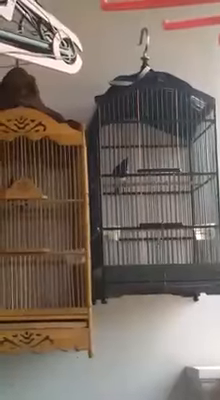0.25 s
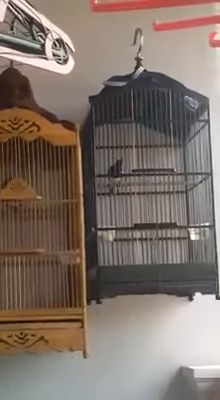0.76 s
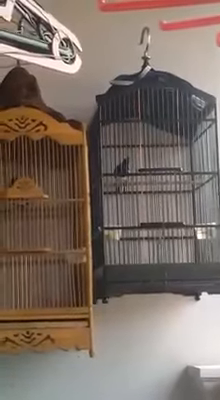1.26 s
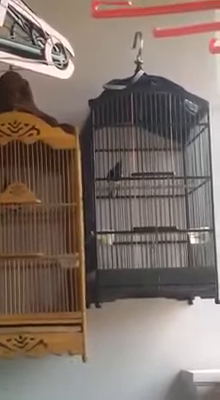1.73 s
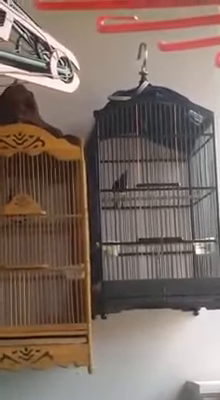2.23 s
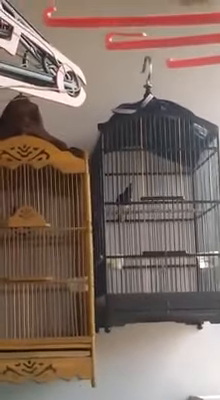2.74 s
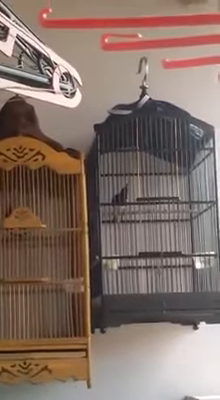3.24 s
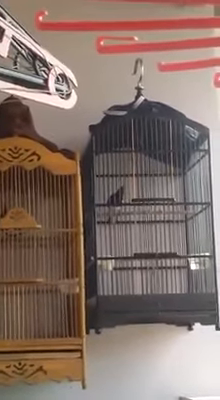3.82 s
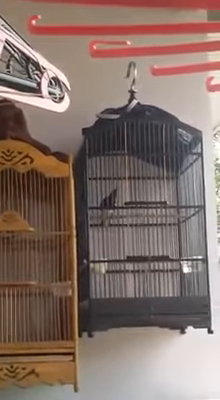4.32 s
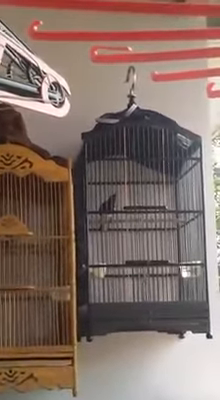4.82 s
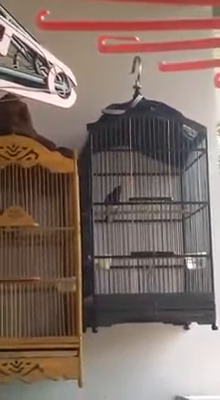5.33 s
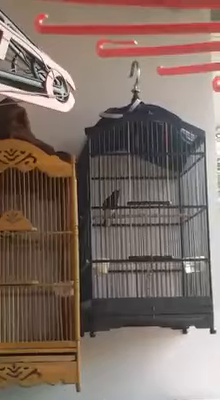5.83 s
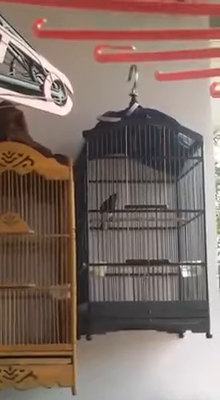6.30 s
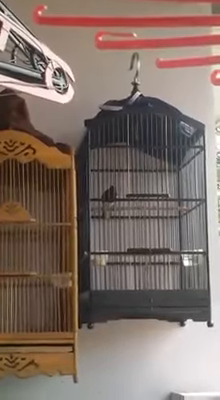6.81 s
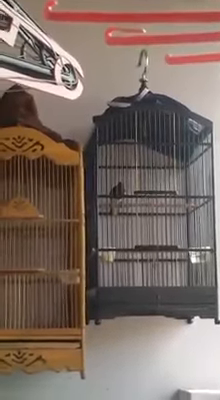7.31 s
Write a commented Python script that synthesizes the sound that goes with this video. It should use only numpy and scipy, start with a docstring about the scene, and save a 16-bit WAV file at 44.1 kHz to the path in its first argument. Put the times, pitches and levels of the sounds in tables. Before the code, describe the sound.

Close bird song with short, hard porch echoes: pure, almost flute-like whistles sliding upward, broken by buzzy, breathy rasps in the middle. After a sparser stretch, the song bursts into fast, loud warbling to the end, with a last rising whistle underneath. Thin high peeps from farther off, small scratchy perch rustles, and a quiet uneven low drone of traffic fill the gaps.

```python
"""Songbirds on a porch

Near birds sing loud warbles, long rising whistles and hoarse rasps that overlap on a hard-walled porch.
Clear notes are near sines with thin upper tones; the rasps are chopped overtones and breath noise.
A farther bird pipes faintly in the same near sines, and feathers rustle as dying puffs of noise.
Low drones, shaped traffic noise and soft hiss lie underneath; sparse random echoes form the walls."""
import sys
import numpy as np
from scipy import signal
from scipy.fft import rfft, irfft
from scipy.io import wavfile
from scipy.ndimage import uniform_filter1d, minimum_filter1d

SR = 44100
rng = np.random.default_rng(int(sys.argv[2]) if len(sys.argv) > 2 else 0)


def put_to_file(sound):
    """Save the sound as 16-bit audio at rate SR, in the file named by the first command-line argument."""
    columns = np.atleast_2d(sound).T  # one column per channel
    safe = np.clip(columns, -1, 1)
    whole_steps = np.round(safe * 32767)
    wavfile.write(sys.argv[1], SR, whole_steps.astype(np.int16))


N = 333396


def near_birds():
    """Near birds: loud warbles, rising whistles and hoarse rasps that overlap."""
    return warble() + rising_whistles() + rasps()


# Warbled notes, each a piece of a pitch wave on a sloping line:
# (start [s], length [s], pitch at mid-note [Hz], slope [Hz/s], wave depth [Hz],
#  wave crest after the start [s], held level [dB], swell [s], fade [s])
WARBLE_NOTES = [(0.272, 0.14, 2463, -2370.0, 242, 0.075, -9, 0.021, 0.03),
                (5.976, 0.19, 2934, -270.0, 79, 0.17, -2.5, 0.085, 0.073),
                (6.258, 0.17, 2438, -3110.0, 253, 0.166, -4.5, 0.028, 0.014),
                (6.505, 0.077, 2333, 4559, 380, 0.0096, -5.5, 0.014, 0.03),
                (6.707, 0.12, 2123, -1230.0, 4.9, 0.024, -5.5, 0.021, 0.043),
                (6.907, 0.11, 2078, 3330.0, 110, -0.019, -5.5, 0.077, 0.011),
                (7.091, 0.145, 2311, -2360.0, 130, 0.132, -3.5, 0.015, 0.014),
                (7.297, 0.12, 2562, -1550.0, 103, 0.039, -7, 0.024, 0.025),
                (7.465, 0.099, 2235, 10.0, 113, 0.017, -8, 0.014, 0.0048)]
# Two warbled notes as the microphone opens, same columns
OPENING_NOTES = [(0, 0.1, 2477, 9995, 10, .04, -10.5, 0.17, .005),
                 (0.094, 0.041, 3075, -500, 10, .03, -34, 0.009, 0.0088)]
# Thin tones of the warble, one per step above the pitch: (level against the note [dB])
WARBLE_UPPER_TONES = (-44.5, -48, -62.5)


def warble():
    """Loud near-sine notes whose pitch rides a slow wave; the octave fades on higher notes."""
    wave_s = 0.16  # period of the pitch wave
    octave_loss_db_per_hz = 0.0625
    out = np.zeros(N)
    for start, length, middle_hz, slope, depth_hz, crest_s, level_db, swell_s, fade_s in OPENING_NOTES + WARBLE_NOTES:
        t, edges = span(length, rise_s=0.0038)
        line_hz = middle_hz + slope * (t - length / 2)
        hz = line_hz + depth_hz * np.cos(2 * np.pi * (t - crest_s) / wave_s)
        db = level_db + swell(t, swell_s, -17, fade_s, -12.5)
        octave_db = -39 - octave_loss_db_per_hz * (hz - 2099.5)
        note = near_sine(edges, hz, db, db, WARBLE_UPPER_TONES, flutter_db=0.48, waver_hz=12, fuzz=0.56,
                         octave_db=octave_db, fuzz_cutoff_hz=210)
        add(out, start, note)
    return out


# Long whistles that climb to a knee, then creep on:
# (start [s], length [s], first pitch [Hz], climb [Hz/s], knee pitch [Hz], sway about the climb [Hz],
#  level before growth and echoes [dB], growth [dB/s], thin tones before growth and pitch gain [dB],
#  swell [s], fade [s])
WHISTLE_NOTES = [(0.783, 0.85, 2871, 1993, 3877, 8, -31, 10, -32.5, 0.087, 0.16),
                 (2.778, 0.8, 2204, 936, 2787, 6.5, -21.5, -0.5, -21, 0.018, 0.16),
                 (4.289, 1.013, 3038, 1446, 4330, 46.5, -20, -2, -21, 0.014, 0.078),
                 (6.991, 0.54, 2708, 2095, 3900, -22, -28, -0.2, -40, 0.041, 0.012)]
# Wall echoes lift some whistle pitches and cancel others: (pitch [Hz], gain [dB])
WALL_GAIN = [(2220, -10), (2310, -1.5), (2345, -15.5), (2385, 0), (2670, -6.5), (2740, 2), (2790, -5.5),
             (2840, -1.5), (3060, -7), (3150, -0.5), (3210, -13), (3290, -1.5), (3470, -8), (3600, -2),
             (3720, -9.5), (3790, 2.5), (3840, -4.5), (3890, -3), (4040, -8), (4170, 7.5), (4310, 8)]
# Level of the thin tones, by the pitch under them: (pitch [Hz], gain [dB])
UPPER_TONE_GAIN = [(2250, -21), (2450, -27), (2700, -35), (2800, -27), (3050, -18.5), (3180, -36.5),
                   (3300, -13), (3620, 0), (3760, -7), (3920, -3), (4150, -11), (4320, -41)]
# Thin tones of the whistles, one per step above the pitch: (gain [dB])
WHISTLE_UPPER_TONES = (-7, -32, -39)


def rising_whistles():
    """Long near-sine glides whose level, and that of their thin tones, varies with pitch."""
    creep_hz_per_s = 285
    out = np.zeros(N)
    for (start, length, first_hz, climb, knee_hz, sway_hz, level_db, growth_db, thin_db,
         swell_s, fade_s) in WHISTLE_NOTES:
        t, edges = span(length, rise_s=0.0043)
        knee_s = (knee_hz - first_hz) / climb
        hz = first_hz + climb * np.minimum(t, knee_s) + creep_hz_per_s * np.maximum(t - knee_s, 0)
        hz = hz + sway_hz * np.sin(2 * np.pi * np.minimum(t / knee_s, 1))
        effort_db = growth_db * t + swell(t, swell_s, -17.5, fade_s, -26.5)
        db = level_db + effort_db + np.interp(hz, *np.transpose(WALL_GAIN))
        upper_db = thin_db + effort_db + np.interp(hz, *np.transpose(UPPER_TONE_GAIN))
        note = near_sine(edges, hz, db, upper_db, WHISTLE_UPPER_TONES, flutter_db=3.0, waver_hz=12.5,
                         fuzz=0.43, octave_db=-6)
        add(out, start, note)
    return out


# Hoarse calls that slide to a knee, then creep on:
# (start [s], length [s], first pitch [Hz], knee pitch [Hz], slide [s], creep [Hz/s],
#  voice peak after the start [s], voice level at its peak [dB], voice fall [dB/s],
#  lowest tone before flutter and beak loss [dB], breath level after its swell [dB],
#  breath fall, negative grows [dB/s], breath colour [Hz])
RASP_CALLS = [(2.208, 0.306, 1278, 2033, .125, 1930, 0.12, -11.5, 105, -24, -17.5, 125, 6100),
              (2.929, 0.57, 1293, 2190, .32, 7.3, 0.25, -17, 102, -48, -28, 36, 4950),
              (4.393, 0.23, 1357, 1850, 0.28, 10, .1, -45, 32, -70, -41.5, 25, 5540),
              (5.939, 0.23, 1990, 1828, 0.027, 410, 0.031, -15, 271, -63, -33, 62, 6600),
              (6.082, 0.099, 2080, 2030, 0.04, 10, 0.082, -29.5, 410, -69, -35, -32, 6100),
              (7.191, .2, 1510, 1886, 0.19, 10, .1, -56, 31, -73, -44, 4, 6160)]


def rasps():
    """Hoarse calls: breath swells in at once, the voice builds to its own peak, wide hiss surrounds them."""
    voice_rise_db_per_s, voice_floor_db = 173, -26  # the floor holds only before the peak
    breath_swell_s, breath_swell_db = 0.046, -9
    low_hold_s, low_fall_db_per_s = 0.07, 130
    out = np.zeros(N)
    for (start, length, first_hz, knee_hz, slide_s, creep, peak_s, voice_peak_db, voice_fall,
         low_peak_db, breath_level_db, breath_fall, breath_hz) in RASP_CALLS:
        t, edges = span(length, rise_s=0.013)
        slide = np.minimum(t / slide_s, 1) ** 1.35
        hz = first_hz + (knee_hz - first_hz) * slide + creep * np.maximum(t - slide_s, 0)
        before_db = np.maximum(-voice_rise_db_per_s * (peak_s - t), voice_floor_db)
        voice_db = voice_peak_db + np.where(t < peak_s, before_db, -voice_fall * (t - peak_s))
        # The lowest tone comes in with the voice, holds briefly, then falls
        low_after_db = -low_fall_db_per_s * np.maximum(t - peak_s - low_hold_s, 0)
        low_db = low_peak_db + np.where(t < peak_s, 2 * before_db, low_after_db)
        breath_db = breath_level_db + breath_swell_db * np.clip(1 - t / breath_swell_s, 0, 1)
        breath_db = breath_db - breath_fall * np.maximum(t - breath_swell_s, 0)
        call = hoarse_voice(edges, hz, voice_db, low_db, breath_db, np.full(len(t), breath_hz))
        hiss = evened(resonate(rng.standard_normal(len(t)), np.full(len(t), 6100), 5100))
        add(out, start, call + edges * gain_of(breath_db - 15.5) * hiss)
    return out


# Colour of the hoarse overtones: (frequency [Hz], level [dB])
BEAK_COLOUR = [(2200, 9), (3000, 18.5), (4200, 21), (5300, 11), (6500, -49), (8000, -26), (9000, -73),
               (11000, -9), (15000, -35)]


def hoarse_voice(edges, hz, voice_db, low_db, breath_db, breath_hz):
    """Shaky overtones and pitch-pulsed breath, both chopped by a slower membrane, over a weak pitch."""
    count = len(hz)
    colour_hz, colour_db = np.transpose(BEAK_COLOUR)
    turns = np.cumsum(hz * (1 + 0.0293 * wobble(count, cutoff_hz=616))) / SR
    overtones = np.zeros(count)
    puffs = 0.6 * rng.standard_normal(count)
    for k in range(2, 8):
        wave = np.cos(2 * np.pi * k * turns)
        shake = 1 + 0.52 * (k - 1) * wobble(count, cutoff_hz=330)
        overtones += gain_of(np.interp(k * hz, colour_hz, colour_db)) * shake * wave
        puffs += wobble(count, cutoff_hz=350) * wave  # breath gathers in bands at the overtones
    breath = resonate(resonate(puffs, breath_hz, 1300), breath_hz, 2600)
    buzz_hz = 132 * (1 + 0.014 * wobble(count, cutoff_hz=46))
    chop = evened(1 + 0.076 * np.cos(2 * np.pi * np.cumsum(buzz_hz) / SR))
    low_flutter_db = 7.0 * wobble(count, cutoff_hz=14.6)
    low = np.sqrt(2) * gain_of(low_db + low_flutter_db) * np.sin(2 * np.pi * turns)
    low /= 1 + (1900 / hz) ** 8  # the small beak hardly radiates a low pitch
    chopped = gain_of(voice_db) * levelled(overtones) + gain_of(breath_db) * levelled(breath)
    return edges * (low + chop * chopped)


def near_sine(edges, hz, db, upper_db, steps_db, flutter_db, waver_hz, fuzz, octave_db, fuzz_cutoff_hz=100):
    """Piped note: a fluttering sine, a faint octave, and thin fuzzy tones at even steps above the pitch."""
    upper_step_hz = 3750
    count = len(hz)
    turns = np.cumsum(hz + waver_hz * wobble(count, cutoff_hz=78)) / SR
    tone = gain_of(db + flutter_db * wobble(count, cutoff_hz=40)) * np.sin(2 * np.pi * turns)
    octave = gain_of(2 * db + octave_db)  # in dB it grows twice as fast as the note
    octave = octave * (1 + fuzz * wobble(count, cutoff_hz=76))
    tone += octave * np.sin(4 * np.pi * turns)
    for k, step_db in enumerate(steps_db, start=1):
        higher = turns + k * upper_step_hz * np.arange(count) / SR
        blur = 1 + fuzz * wobble(count, cutoff_hz=fuzz_cutoff_hz)
        tone += gain_of(upper_db + step_db) * blur * np.sin(2 * np.pi * higher)
    return np.sqrt(2) * edges * tone


# Faint far notes:
# (start [s], length [s], first pitch [Hz], last pitch [Hz], first level [dB], last level [dB])
FAR_NOTES = [(0.143, .18, 4210, 4120, -64.5, -43.5), (0.42, 0.11, 1920, 1810, -40, -50),
             (0.514, 0.56, 4650, 4125, -55.5, -51), (1.326, .42, 3700, 3144, -49, -47.5),
             (2.529, 0.417, 4120, 4033, -42.5, -41), (3.943, 0.19, 4040, 4060, -36, -71),
             (5.4, .16, 4180, 4060, -40.5, -62)]
# Thin tones of the far bird, one per step above the pitch: (level against the note [dB])
FAR_UPPER_TONES = (-18.5, -30, -36)


def far_bird():
    """Thin notes of a farther bird; the pitch moves quickly at first, then levels out."""
    out = np.zeros(N)
    for start, length, first_hz, last_hz, first_db, last_db in FAR_NOTES:
        t, edges = span(length, rise_s=0.0095)
        hz = last_hz + (first_hz - last_hz) * (1 - t / length) ** 2
        db = first_db + (last_db - first_db) * t / length
        note = near_sine(edges, hz, db, db, FAR_UPPER_TONES, flutter_db=3.5, waver_hz=25.2, fuzz=0.4, octave_db=-1)
        add(out, start, note)
    return out


# Feathers and feet on the perch:
# (start [s], level before the decay [dB], time to fall 60 dB [s], tilt [dB/octave])
RUSTLE_PUFFS = [(1.698, -37, 0.73, -1), (1.798, -41, 0.98, -1.5), (2.799, -36, 0.64, 0.5),
                (3.39, -38, 0.77, -1.5), (3.909, -24, 0.23, -2), (4.548, -35, 1, -3.5),
                (5.108, -35, 0.38, -1.5), (5.361, -28.5, 0.33, 2.5), (5.852, -27, 0.07, -3),
                (5.891, -37.5, 1, -1.5), (6.242, -26, 0.17, 0), (6.456, -32.5, 0.095, 2.5)]


def rustles():
    """Scratchy puffs of wide, tilted noise that die away."""
    out = np.zeros(N)
    t = np.arange(SR // 2) / SR
    hz = np.fft.rfftfreq(len(t), 1 / SR)
    for start, level_db, t60, tilt_db in RUSTLE_PUFFS:
        colour = gain_of(tilt_db * np.log2(hz / 4000 + 0.0057)) / (1 + (hz / 12000) ** 4)
        puff = evened(irfft(rfft(rng.standard_normal(len(t))) * colour, len(t)))
        db = level_db - 60 * t / t60 + 2.35 * wobble(len(t), cutoff_hz=40)
        add(out, start, puff * gain_of(db) * np.minimum(t / 0.011, 1))
    return out


# Swells of the lower drone: (time [s], level [dB])
DRONE_LEVEL = [(.14, -72), (.43, -47.5), (1.1, -52), (1.37, -38), (2.04, -27), (2.33, -43), (2.72, -34),
               (3.3, -35), (3.72, -45), (3.98, -37.5), (5.52, -38.5), (5.68, -51), (5.89, -35.5),
               (6.1, -47.5), (6.35, -51), (6.6, -29.5), (6.83, -42), (6.96, -29.5), (7.22, -44.5),
               (7.56, -50)]
# Background levels: (time [s], traffic level [dB], hiss level [dB])
BACKGROUND_LEVEL = [(.08, -72, -53), (.14, -57, -68), (.27, -46.5, -65), (1.1, -47, -65.5),
                    (1.37, -37, -58), (2.0, -35.5, -54.5), (2.35, -35.5, -48.5), (2.7, -36, -53),
                    (3.15, -34.5, -53), (3.7, -36, -55), (4, -33.5, -51.5), (4.4, -36, -57),
                    (5.15, -34.5, -56), (5.9, -34, -51), (6.1, -36.5, -40.5), (6.35, -41.5, -53.5),
                    (6.7, -38, -55.5), (7.22, -43, -62), (7.56, -46, -65)]
# Traffic rumble colour: (frequency [Hz], relative density [dB])
TRAFFIC_COLOUR = [(18, -61), (30, -42.5), (59, -18), (80, -17), (102, -1), (228, -6), (496, -16.5),
                  (538, -18.5), (688, -20.5), (935, -19.5), (2500, -27), (4000, -49), (5200, -51.5),
                  (8800, -120)]
# Hiss colour: (frequency [Hz], relative density [dB])
HISS_COLOUR = [(1470, -23), (2500, -5.5), (2680, -4.5), (3190, -1), (4110, 3), (4570, 2.5), (11200, -9.5),
               (15500, -13)]


def background():
    """A low drone, traffic rumble and hiss, each with its own level curve; a higher drone follows the traffic."""
    t = np.arange(N) / SR
    times, traffic_levels, hiss_levels = np.transpose(BACKGROUND_LEVEL)
    drone_db = np.interp(t, *np.transpose(DRONE_LEVEL))
    traffic_db = np.interp(t, times, traffic_levels)
    hiss_db = np.interp(t, times, hiss_levels)
    low, high = (np.sin(2 * np.pi * np.cumsum(hz + 7 * wobble(N, cutoff_hz=12)) / SR) for hz in (80, 131))
    drone = np.sqrt(2) * low * (1 + 0.25 * wobble(N, cutoff_hz=14))
    traffic = noise(TRAFFIC_COLOUR, low_hz=110, high_hz=1520, patchy_db=2.5) + gain_of(-8) * high
    hiss = noise(HISS_COLOUR, low_hz=5600, high_hz=6600, patchy_db=1.5)
    return gain_of(drone_db) * drone + gain_of(traffic_db) * traffic + gain_of(hiss_db) * hiss


def porch(x, t60=0.35, first_s=0.0024):
    """Hard walls: sparse echoes of random sign that fade in after a gap and die away."""
    t = np.arange(SR) / SR
    taps = np.zeros(SR)
    at = np.arange(0, SR - 20, 20) + rng.integers(0, 20, (SR - 1) // 20)
    taps[at] = rng.choice([-1., 1.], len(at))
    tail = taps * gain_of(-60 * t / t60) * np.clip(t / first_s - 1, 0, 1)
    return signal.fftconvolve(x, tail / np.linalg.norm(tail))[:N]


def noise(colour, low_hz, high_hz, patchy_db):
    """Coloured noise from random short-time spectra with drifting patches, about rms 1 between two frequencies."""
    hz = np.fft.rfftfreq(1024, 1 / SR)
    real, imaginary, patches = rng.standard_normal((N // 256 + 5, 513, 3)).T
    patches = uniform_filter1d(uniform_filter1d(patches, size=10, axis=0), size=10, axis=1)
    colour_hz, colour_db = np.transpose(colour)
    shape = gain_of(np.interp(np.log(hz + 1), np.log(colour_hz), colour_db, left=-100))
    spectra = (real + 1j * imaginary) * shape[:, None] * gain_of(patchy_db * evened(patches))
    out = signal.istft(spectra, nperseg=1024, noverlap=768)[1][:N]
    band = (hz >= low_hz) & (hz < high_hz)
    share = np.sqrt((shape[band] ** 2).sum() / (shape ** 2).sum())
    return evened(out) / share


def resonate(x, hz, width):
    """Moving resonance: shifts the curve hz down to zero, smooths, and shifts back."""
    turn = np.exp(2j * np.pi * np.cumsum(hz) / SR)
    r = np.exp(-np.pi * width / SR)
    return 2 * (turn * signal.lfilter([1 - r], [1, -r], x / turn)).real


def wobble(count, cutoff_hz):
    """Smooth random curve of rms 1: low-passed noise with its start-up cut off."""
    raw = rng.standard_normal(count + 4000)
    return evened(signal.lfilter(*signal.butter(2, cutoff_hz, fs=SR), raw)[4000:])


def span(length, rise_s):
    """Time from the start of a note and its soft-edged window."""
    t = np.arange(0, length, 1 / SR)
    return t, np.clip(np.minimum(t, length - t) / rise_s, 0, 1)


def swell(t, swell_s, swell_db, fade_s, fade_db):
    """Level in dB: a rise from swell_db over swell_s plus a fall to fade_db over fade_s."""
    rising = swell_db * np.clip(1 - t / swell_s, 0, 1)
    fading = fade_db * np.clip(1 - (t[-1] - t) / fade_s, 0, 1)
    return rising + fading


def gain_of(db):
    """Amplitude factor of a level in dB."""
    return 10 ** (np.asarray(db) / 20)


def evened(x):
    """Scales the whole signal to rms 1."""
    return x / np.sqrt(np.mean(x ** 2) + 1e-20)


def levelled(x):
    """Divides by the running rms, so slow level changes even out."""
    return x / np.sqrt(uniform_filter1d(x ** 2, size=1500) + 1e-12)


def add(mix, start_s, sound):
    """Mixes a sound in at its start time, cut at the end of the mix."""
    part = mix[round(start_s * SR):][:len(sound)]
    part += sound[:len(part)]


def scene():
    """Near and far birds and the rustles with porch echoes, over the dry background."""
    sources = near_birds() + rustles() + far_bird()
    return (sources + gain_of(-12) * porch(sources) + background())[None]


def record(dry, ceiling_db=-0.5, envelope_fall_db_per_s=150):
    """The microphone opens and drops the deepest bass, a limiter holds loud notes, a low-pass trims the top."""
    opened = dry * np.clip((np.arange(N) / SR - 0.095) / 0.037, 0, 1)
    opened = opened * np.minimum(np.arange(N)[::-1] / 200, 1)  # closes without a click
    thinned = signal.sosfilt(signal.butter(2, 55, "high", fs=SR, output="sos"), opened)
    peak_db = 20 * np.log10(-minimum_filter1d(-abs(thinned[0]), size=200) + 1e-9)
    # The peak envelope jumps up at once and falls at a steady rate
    fall_db = np.arange(N) * envelope_fall_db_per_s / SR
    envelope_db = np.maximum.accumulate(peak_db + fall_db) - fall_db
    over_db = np.maximum(envelope_db - ceiling_db, 0)
    held = thinned / gain_of(1.3 * uniform_filter1d(over_db, size=100))  # pulls down more than the excess
    low_pass = signal.firwin(511, 15500, window=("kaiser", 9), fs=SR)
    return signal.oaconvolve(held, low_pass[None], "same")


dry = scene()
out = record(dry)
put_to_file(out)
```